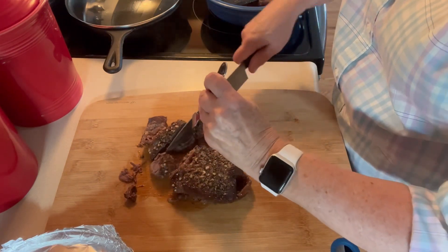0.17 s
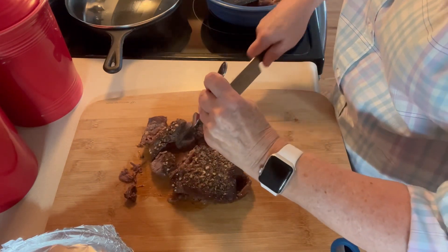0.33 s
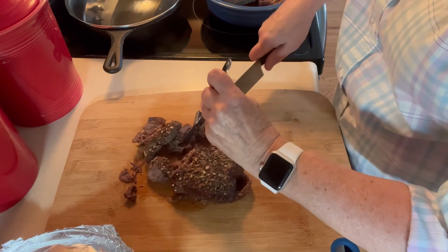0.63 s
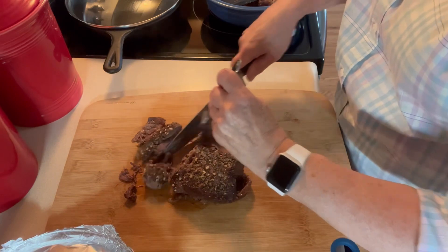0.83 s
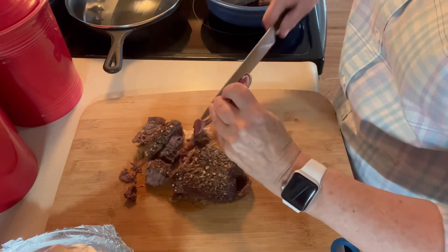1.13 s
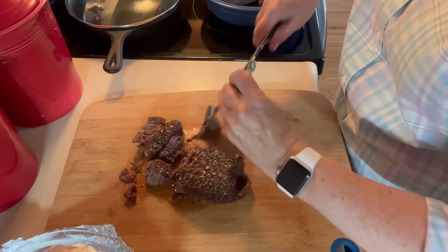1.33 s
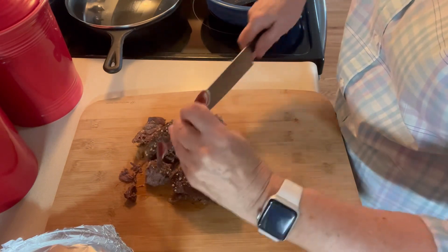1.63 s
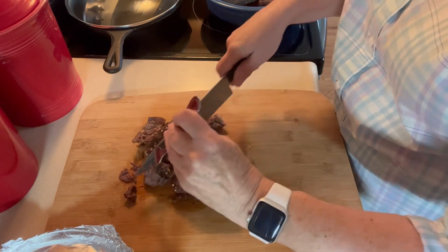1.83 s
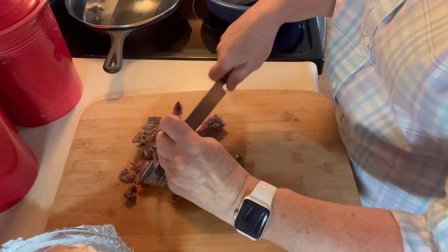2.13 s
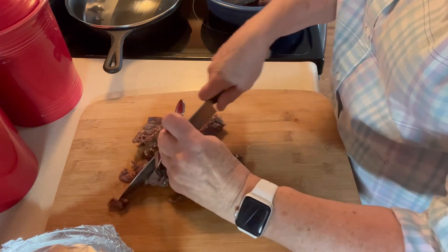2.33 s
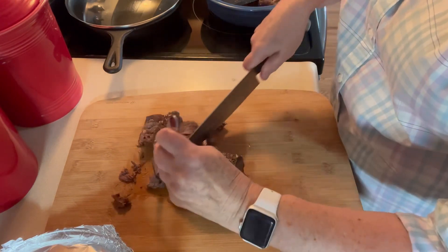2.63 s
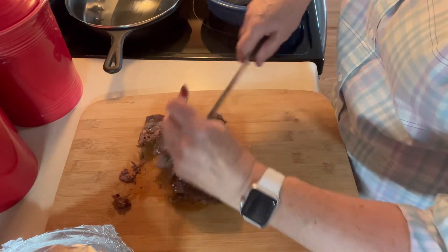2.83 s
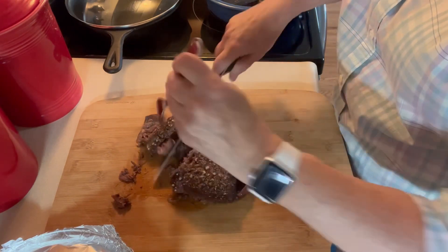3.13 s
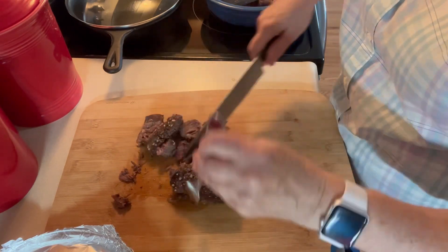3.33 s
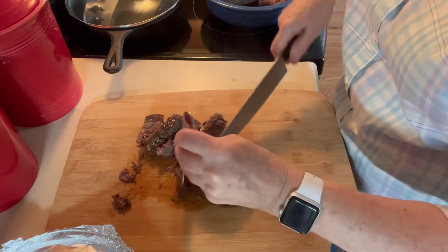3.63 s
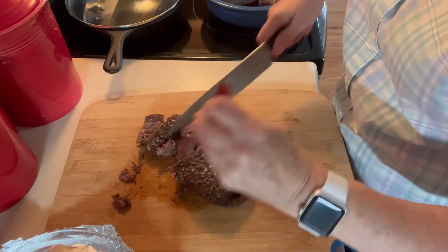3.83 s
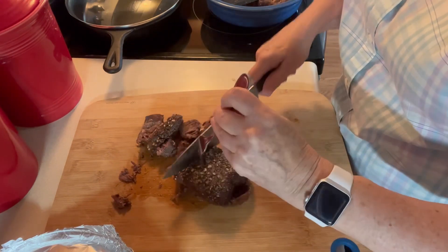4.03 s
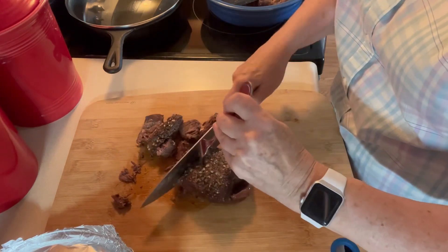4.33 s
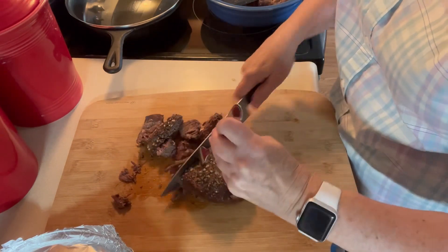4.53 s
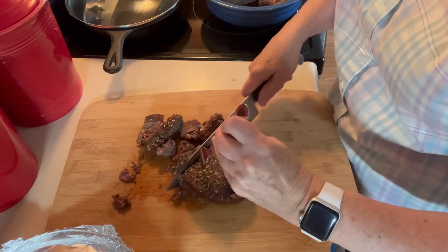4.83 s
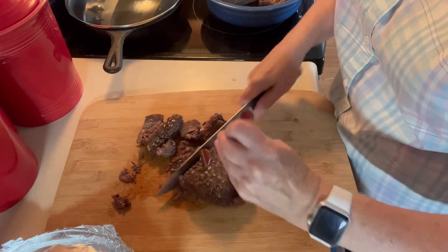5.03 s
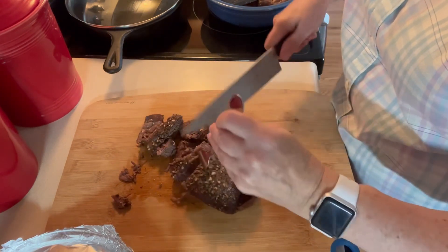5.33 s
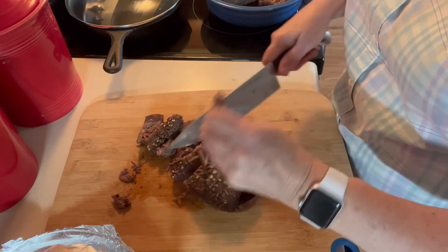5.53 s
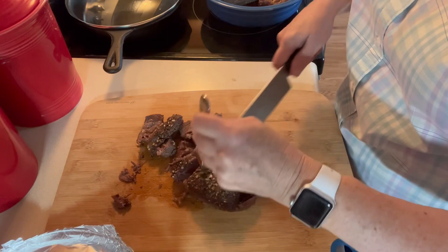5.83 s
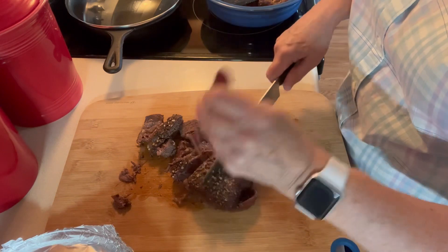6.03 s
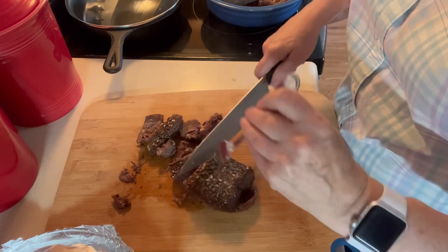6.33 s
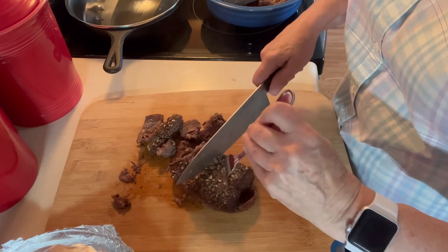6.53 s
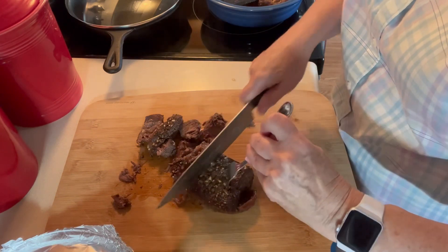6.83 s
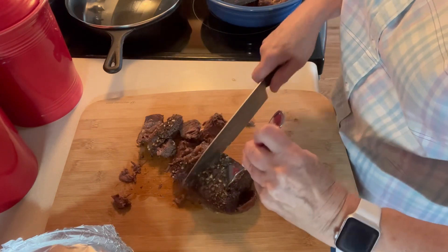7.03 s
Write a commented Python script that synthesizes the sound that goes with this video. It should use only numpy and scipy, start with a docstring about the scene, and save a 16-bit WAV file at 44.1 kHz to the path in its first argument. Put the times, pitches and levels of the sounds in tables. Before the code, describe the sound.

Close-up meat carving: dry scraping knife strokes, woody thuds, two brief metallic scrapes of blade on fork, moist ticks, over soft appliance hum.

```python
"""Friction and impact in carving a roast

A carving knife saws through a roast on a wooden board in a small kitchen, close to the two microphone ports.
Stick-slip noise shaped by resonances gives the rasp of the crust, the drone of the board and the blade's
scrapes and squeaks along the steel fork. Struck modes give the knocks and clinks; short noise bursts, the
moist ticks. Soft rustles are banded noise; behind all, an appliance hums in wavering sines over noise."""
import sys
import numpy as np
from scipy import signal
from scipy.fft import rfft, irfft, next_fast_len
from scipy.io import wavfile
from scipy.ndimage import uniform_filter1d, map_coordinates

SR = 44100
rng = np.random.default_rng(int(sys.argv[2]) if len(sys.argv) > 2 else 0)


def store_wav(level_fs):
    """Save 16-bit WAV to argv[1]."""
    pcm = np.round(np.clip(np.atleast_2d(level_fs), -1, 1) * 32767)
    wavfile.write(sys.argv[1], SR, pcm.T.astype(np.int16))


N = 316269  # samples
TOP_HZ = 16900  # upper band limit

# appliance motor: (f/Hz, level/dB, waver of the phase/rad)
MOTOR_HUM = [(57, -50, 0.84), (120.4, -43, 1.6), (196.1, -53.5, 0.35), (221.9, -52.5, 2.2),
             (257.5, -45, 0.46), (371, -61, 0.76)]
# spectrum of the room air: (f/Hz, level/dB)
AIR_COLOUR = [(20, -19), (35, -14.5), (55, -1), (85, 2.5), (115, -10), (150, -2.5), (250, -7), (400, -13),
              (650, -22.5), (1400, -28.5), (2400, -37), (4600, -50.5), (12000, -59.5), (16000, -61.5)]
# left-right likeness of the air noise: (f/Hz, likeness)
AIR_ALIKE = [(60, 1), (180, 0.29), (550, -0.015), (1650, -0.46), (4970, 0.39), (15000, -0.33)]

# decay of the room's tail: (f/Hz, t60/s)
KITCHEN_DECAY = [(150, 0.99), (700, 0.51), (3000, 0.48), (8000, 0.3), (15000, 0.28)]
# left-right likeness of the echoes: (f/Hz, likeness)
ECHO_ALIKE = [(200, 0.075), (800, 0.033), (4000, 0.057), (7000, 0.038), (9500, 0.72), (12000, 0.0028),
              (14000, 1)]
# the two microphone ports: (f/Hz, lead of left/rad)
PORT_PHASE = [(200, 0), (750, .45), (2000, -.3), (3000, -.7), (5000, -2.3), (7000, -1.8), (8000, -1.1),
              (9100, -.15), (10700, .15), (12000, 1.7), (13000, 2.6), (14300, 3.1), (15500, 3.7)]
# the two microphone ports: (f/Hz, left minus right/dB)
PORT_TILT = [(100, 3.5), (700, 3.5), (1200, -1), (2400, 0.5), (4500, -5), (8000, -1), (13000, 0)]
ECHO_TURN_HZ = 1.1  # two echo patterns trade places steadily, so that the echo colour keeps changing

# soft rustles as the arms and the meat are shifted: (t of the peak/s, length/s, level/dB, centre f/Hz)
RUSTLES = [(1.485, 0.18, -57.5, 1560), (6.432, 0.2, -72, 2100), (6.64, 0.12, -85, 2185)]
RUSTLE_WIDTH_HZ = 1100

# clearest moist ticks of meat and juice: (t/s, level/dB, f/Hz)
CLEAR_TICKS = [(0.359, -40, 5800), (0.7125, -27, 9100), (1.8935, -39, 8100), (2.1345, -31.5, 5300),
               (3.6226, -46, 3020), (3.642, -41.5, 8200), (3.7797, -47, 7900), (4.0256, -44.5, 5300),
               (4.095, -44.5, 9030), (4.1933, -49, 11700), (4.4934, -39, 7100), (5.3541, -40.5, 3290),
               (5.399, -40.5, 4010), (5.5677, -50.5, 3390), (5.985, -40, 8800), (6.028, -41, 8360),
               (6.149, -41, 6000), (6.383, -57, 3000), (6.4373, -46.5, 3090), (6.578, -48.5, 11100),
               (7.0892, -43, 8920)]
# spells of shifting the meat, with faint ticks at random: (start t/s, end t/s)
HANDLING = [(3.901, 4.3), (6.299, 6.8)]
# spectrum of a moist snap: (f/Hz, level/dB)
MOIST_COLOUR = [(500, -27), (2000, -8), (5000, 1.5), (9000, -4), (12500, -4), (16000, 3)]
FAINT_DB, FAINT_SPREAD_DB = -66, 3
FAINT_HZ, FAINT_SPREAD_OCT = 6840, 0.5

# modes of the blade: (f/Hz, width/Hz, level/dB)
BLADE_MODES = [(2900, 13, -11.5), (3840, 130, -2), (5110, 150, -4.5), (5100, 80, -5.5), (7200, 54, -8.5),
               (7060, 58, -7.5), (7940, 110, -7), (8330, 160, 0), (8800, 150, -7.5), (9500, 120, -4.5),
               (9730, 240, -8.5), (10860, 160, -1.5), (12400, 400, -5.5)]
# spectrum of the steel scrape: (f/Hz, level/dB)
SCRAPE_COLOUR = [(200, -20.5), (700, -10.5), (1800, -7), (2600, -10), (3800, -4), (5300, 2), (6800, -4),
                 (9000, 1), (11000, -3), (12700, 4.5), (14000, 7), (16000, -2.5)]
# blade slides along the fork, one table per slide: (t/s, level/dB)
SLIDES = [
    [(1.277, -40.5), (1.295, -41.5), (1.32, -37.5), (1.338, -39), (1.355, -39.5), (1.385, -37.5),
     (1.41, -54.5), (1.44, -69.5)],
    [(2.93, -36.5), (2.948, -32.5), (2.962, -30), (2.978, -30), (2.99, -33), (3.0, -30), (3.015, -45.5)],
]
# treble of each slide against its middle range: level/dB
SLIDE_TREBLE_DB = [-2, -6]
# the sliding blade catches and squeaks: (start t/s, length/s, level/dB, first f/Hz, last f/Hz)
SQUEAKS = [(1.27, 0.026, -40, 4240, 3800), (1.28, 0.022, -48, 5100, 5600), (1.28, 0.036, -37, 8000, 8480),
           (1.292, .02, -39.5, 9600, 9200), (1.312, 0.023, -41.5, 7200, 9800),
           (1.312, 0.031, -46.5, 3800, 3800), (1.319, 0.012, -40, 8000, 6900),
           (1.326, 0.052, -43.5, 5480, 6400), (1.337, 0.0325, -43.5, 4230, 3300),
           (1.335, 0.064, -60, 2750, 2600), (1.272, 0.035, -53, 3350, 3400),
           (1.335, 0.046, -54, 5050, 4750), (1.325, .06, -49, 6550, 7700),
           (1.345, 0.028, -44.5, 8700, 9850), (1.345, 0.062, -42.5, 12600, 13000),
           (1.364, 0.017, -50, 3900, 4100), (1.32, .075, -58, 3500, 2700), (2.924, 0.032, -37, 4830, 4500),
           (2.95, 0.023, -41.5, 3850, 2900), (2.971, 0.0091, -37, 2980, 3800),
           (2.969, 0.02, -32, 5500, 5900), (2.966, 0.018, -35, 8600, 9830), (2.966, .016, -36, 7400, 8300),
           (2.98, 0.02, -38, 5400, 4700), (2.989, 0.016, -34.5, 8850, 8700)]
# unsteadiness, its changes per second, share of the length spent rising (and again falling)
SQUEAK_FUZZ, SQUEAK_FUZZ_RATE, SQUEAK_EDGE = 0.36, 490, 0.38

# blade meets fork: (t/s, chatter level/dB, low chatter level/dB, chatter t60/s, strongest ring f/Hz,
# fork ring level/dB, fork pitch ratio, f below which the meat muffles the tines/Hz)
CLINKS = [(1.2723, -39.5, -21, 0.046, 8900, -48.5, 1, 2500),
          (1.816, -56, -3.5, 0.11, 9550, -34.5, 0.68, 5200),
          (2.9233, -37.5, 2.5, 0.03, 8735, -41, 0.97, 600), (5.834, -46.5, -8, 0.053, 7780, -36, 1, 605),
          (5.841, -52, -22, 0.032, 7700, -39, 0.84, 600)]
# modes of the tines before the pitch ratio: (f/Hz, level/dB, t60/s)
FORK_MODES = [(760, -11, 0.054), (1200, -12, .08), (1840, -15.5, 0.046), (2160, -11.5, 0.12),
              (2780, -16, 0.041), (3080, -14, .09), (3690, -2.5, 0.075), (4000, -5.5, 0.06),
              (4440, -3, 0.07), (4920, -5.5, 0.08), (5430, -5, 0.082), (5960, -9, 0.059), (6880, 1, 0.063),
              (7500, 1, 0.097), (8800, -7.5, .08), (10900, -3.5, 0.041), (11600, -8, .06)]
RATTLE_RAD, RATTLE_RATE = 0.7, 230  # the rattling blade roughens the ring: phase jitter, changes per second

# modes of the wooden board, free of the blade's pressure: (f/Hz, level/dB, t60/s)
BOARD_MODES = [(68, -21.5, 0.17), (142, -12, 0.13), (232, -12.5, 0.11), (300, -16, 0.1), (457, -7, 0.11),
               (478.4, -9, 0.12), (574, -11.5, 0.083), (684, -20, 0.011), (719, -12.5, 0.1),
               (815, -11, 0.14), (1044, -13, 0.08), (1386, -8, 0.021), (1470, -9.5, 0.03),
               (2069, -8.5, 0.02), (4000, -7.5, 0.0078), (4350, 0.5, 0.0088)]
# blows on the board: (t/s, level/dB, struck spot f/Hz, contact cut-off f/Hz, low modes level/dB, crack level/dB)
KNOCKS = [(0.424, -28.5, 702, 2000, 0.5, -1.5), (.538, -29, 455, 550, 1.5, -30),
          (.756, -41, 761, 2500, 6.5, 3.5), (0.8403, -14, 732, 850, -10, -16.5),
          (.868, -26, 597, 700, 2, -28), (1.232, -17, 760, 900, -3.5, -30),
          (2.057, -31.5, 770, 1220, 4.5, -12), (2.1748, -22.5, 789, 2000, 0.5, -19),
          (3.0209, -23.5, 880, 797, -4, -31.5), (3.0245, -4, 844, 2500, -8, 1),
          (3.033, -10, 480, 450, -4.5, -29.5), (3.075, -23, 740.5, 800, 8.5, -19),
          (4.565, -26, 760, 1250, 4, -20), (5.154, -30.5, 644, 1310, 0, -23),
          (5.355, -49, 809, 2490, -10, -19)]
# parts of the wide board swing out of step, so a blow reaches the ports unlike: (f/Hz, lead of left/rad)
BOARD_PHASE = [(100, -0.91), (450, 0.81), (800, 0.49), (1200, -1.4), (2000, -0.91), (3500, -1.5)]
# spectrum of the crack of a blow: (f/Hz, level/dB)
CRACK_COLOUR = [(200, -8), (1150, -2), (1520, 11.5), (1750, 4), (2020, 12.5), (2400, -0.5), (3200, -7),
                (4200, 5.5), (5200, -2.5), (6300, -6.5), (7500, -21), (14000, -30)]

# strokes of the knife: (start t/s, length/s, rise/s, board drone level/dB, crust rasp level/dB,
# edge hiss level/dB, pinched blade's ring f/Hz, that ring's level/dB, rubbed spot f/Hz)
STROKES = [ (0, 0.2, 0.11, -64, -62, -57, 2400, -15, 690),
           (0.16, 0.21, 0.03, -73, -68.5, -63.5, 2550, -13, 704),
           (0.306, 0.22, 0.073, -57, -59.5, -61, 2560, -13, 740),
           (0.418, 0.059, 0.0049, -32, -36, -46, 2370, 12, 713),
           (0.476, 0.17, 0.096, -42, -42, -49, 2520, 1, 790),
           (0.64, 0.12, 0.037, -70, -57, -59, 2430, 5, 780),
           (0.744, 0.27, 0.0056, -49, -52.5, -60, 1260, -11, 780),
           (0.797, 0.27, 0.14, -44.5, -42.5, -47, 2500, 0, 780),
           (1.912, 0.31, 0.092, -86, -65, -63, 1730, -22, 800),
           (2.114, 0.19, 0.1, -45.5, -44.5, -42.5, 1560, 2, 800),
           (2.291, 0.43, 0.074, -50.5, -45.5, -46, 2000, -1, 830),
           (2.32, 0.25, 0.063, -62.5, -52.5, -65, 1488, 10, 881),
           (2.737, 0.19, 0.043, -61.5, -64.5, -75, 1750, -1, 795),
           (4.119, 0.22, 0.12, -90, -89, -62, 2220, -3, 800),
           (4.274, 0.27, 0.11, -80, -63, -64.5, 2190, -22, 793),
           (4.485, 0.16, 0.048, -74, -58, -43, 4000, 6, 800),
           (4.54, 0.12, 0.099, -43, -44.5, -50, 2760, -8, 780),
           (4.629, 0.2, 0.097, -44.5, -44, -41, 2210, -13, 810),
           (4.813, 0.16, 0.066, -44, -41, -44.5, 2220, -1, 835),
           (4.946, 0.2, 0.081, -39.5, -42.5, -46, 2870, -7, 743),
           (5.053, 0.19, 0.096, -49.5, -44.5, -49, 1230, 1.5, 725),
           (6.58, 0.49, 0.087, -91.5, -94, -67.5, 2080, -3, 800),
           (6.713, 0.099, 0.021, -79, -82, -58.5, 2080, -1, 800),
           (6.892, 0.21, 0.03, -78, -73.5, -67.5, 2100, -7, 797),
           (7.051, 0.22, 0.066, -86, -72, -63, 2100, -7, 810), ]
# edge cuts through and judders on bare wood: (t of hardest pressure/s, length/s, level/dB, f/Hz)
DRAGS = [(0.528, 0.045, -37, 720), (0.565, 0.085, -37, 770), (0.826, 0.035, -31, 800),
         (0.871, 0.032, -43, 704), (4.777, 0.07, -43, 790), (4.873, 0.063, -41, 790),
         (5.149, 0.089, -37.5, 725)]
# spectrum of the crust rasp: (f/Hz, level/dB)
RASP_COLOUR = [(300, -23), (800, -14.5), (1100, -8), (1400, 5.5), (1750, -4.5), (2100, -2.5), (2600, -3),
               (3300, -5), (3900, -1.5), (4600, -4.5), (5300, -3), (7500, -14.5), (14000, -43.5)]
# spectrum of the edge hiss: (f/Hz, level/dB)
HISS_COLOUR = [(1500, -32.5), (4000, -8), (5500, 0.5), (7000, -4.5), (9000, -2), (11000, -6), (12700, 3),
               (14000, 0.5), (16000, -4.5)]
# spectrum of the rubbed board: (f/Hz, level/dB)
DRONE_COLOUR = [(150, -8), (350, -2.5), (450, 3), (590, 2), (800, 4), (1100, -5), (1400, -11), (1650, -12),
                (2500, -7.5)]
STOP_S = 0.095  # the blade slows before it turns round
# a stroke grows softer and duller as the edge sinks in
DRONE_SAG_DB_PER_S, RASP_SAG_DB_PER_S, HISS_SAG_DB_PER_S = 30, 33.5, 51
# single fibres and crumbs of crust: snaps per second, middle pitch, cycles to fall 60 dB, level against the rasp
FIBRE_RATE, FIBRE_HZ, FIBRE_CYCLES, FIBRE_DB = 330, 2730, 30, -6.5
FIBRE_SPREAD_OCT, FIBRE_SPREAD_DB = 0.65, 4
DRONE_DRIFT, DRONE_DRIFT_RATE = 0.03, 13  # scale of the random pitch drift (share of pitch), changes per second
BLADE_WIDTH_HZ, SPOT_WIDTH_HZ = 140, 115  # widths of the pinched blade's ring and of the rubbed spot's
SPOT_DB = 3  # rubbed spot over the rest of the board


def amp(db):
    """Decibel law: level to amplitude ratio."""
    return 10 ** (np.asarray(db) / 20)


def unit(x):
    """Normalisation: scale to rms 1."""
    return x / np.sqrt(np.mean(x ** 2) + 1e-20)


def along(points, hz):
    """Interpolation: (f/Hz, value) points read on a logarithmic frequency axis."""
    f, v = np.transpose(points)
    return np.interp(np.log(hz + 1), np.log(f + 1), v)


def curves(rows):
    """Interpolation: one value per sample for each column after the time."""
    s, *cols = np.transpose(rows)
    return np.array([np.interp(np.arange(N) / SR, s, c) for c in cols])


def during(rows):
    """Gating: 1 within a table's time span, with 5 ms fades outside it."""
    t = np.arange(N) / SR
    return np.clip(np.minimum(t - rows[0][0], rows[-1][0] - t) / .005 + 1, 0, 1)


def ease(u):
    """Raised-cosine law: a smooth step from 0 to 1 as u goes from 0 to 1."""
    return np.sin(np.pi / 2 * np.clip(u, 0, 1)) ** 2


def wobble(rate, size=N):
    """Random modulation: a smooth curve through rate random knots per second."""
    knots = rng.standard_normal(int(size * rate / SR) + 4)
    return map_coordinates(knots, [np.arange(size) * rate / SR])


def filtered(x, response):
    """Linear filtering: the spectrum of x times a complex response of frequency."""
    n = x.shape[-1]
    m = next_fast_len(n + 8192)
    return irfft(rfft(x, m) * response(np.fft.rfftfreq(m, 1 / SR)), m)[..., :n]


def coloured(x, spectrum):
    """Spectral shaping: x filtered by (f/Hz, level/dB) points."""
    return filtered(x, lambda hz: amp(along(spectrum, hz)))


def resonances(modes, hz):
    """Modal superposition: causal response of (f/Hz, width/Hz, level/dB) modes in alternating sign."""
    return sum((-1) ** k * amp(db) * 1j * hz * w / (c * c - hz * hz + 1j * hz * w)
               for k, (c, w, db) in enumerate(modes))


def add(track, s, sound):
    """Superposition: mix a sound into the track at time s."""
    part = track[max(round(s * SR), 0):][:len(sound)]
    part += sound[:len(part)]


def slips(rate, spread_db):
    """Friction: tiny random slips of uneven size, on average rate per second."""
    hit = rng.random(N) < rate / SR
    return unit(hit * rng.standard_normal(N) * amp(spread_db * rng.standard_normal(N)))


def shifting(x, patchy_db):
    """Moving contact: the colour of a scrape wanders as the point of contact moves."""
    z = signal.stft(x, nperseg=512)[2]
    field = rng.standard_normal(z.shape)
    field = uniform_filter1d(field, size=4, axis=0)  # smooth over frequency
    field = uniform_filter1d(field, size=12, axis=1)  # and over time
    return unit(signal.istft(z * amp(patchy_db * unit(field)), nperseg=512)[1][:N])


def paired(noises, alike):
    """Coherence: two unrelated noises become left and right with a (f/Hz, likeness) table."""
    turn = lambda hz: np.arccos(np.clip(along(alike, hz), -1, 1)) / 2
    mid, side = filtered(noises, lambda hz: np.array([np.cos(turn(hz)), np.sin(turn(hz))]))
    return np.array([mid + side, mid - side])


def leading(pair, phase):
    """Phase difference: left leads right by a (f/Hz, lead/rad) table."""
    sides = np.array([[.5], [-.5]])
    return filtered(pair, lambda hz: np.exp(1j * sides * along(phase, hz)))


def background(waver_rate=9, flutter_db=2.5, swell_db=0.3):
    """Line spectrum over noise: a motor hums unsteadily over the gently swelling rush of its fan."""
    t = np.arange(N) / SR
    hum = 0
    for hz, db, waver in MOTOR_HUM:
        phase = 2 * np.pi * (hz * t + rng.random()) + waver * wobble(waver_rate)
        hum = hum + amp(db + flutter_db * wobble(5.8)) * np.sin(phase)
    rush = unit(coloured(paired(rng.standard_normal((2, N)), AIR_ALIKE), AIR_COLOUR))
    return amp(-44 + swell_db * wobble(3.6)) * rush + hum


def echoes(early_db, early_t60, late_db):
    """Reverberation: one random pattern of quick echoes from counter and pots and the room's tail."""
    hz, t, z = signal.stft(rng.standard_normal((2, SR // 2)), SR, nperseg=256)
    decay = amp(-60 * t / along(KITCHEN_DECAY, hz)[:, None])
    late = signal.istft(z * decay, SR, nperseg=256)[1]
    t = np.arange(late.shape[1]) / SR
    early = rng.standard_normal(late.shape) * amp(-60 * t / early_t60) * (t > .002)
    late = late * (1 - np.exp(-t / 0.0062))
    return paired(amp(early_db) * unit(early) + amp(late_db) * unit(late), ECHO_ALIKE) / np.sqrt(len(t))


def kitchen(x, early_db, late_db, early_t60=0.037):
    """Convolution: each port hears the source and two echo patterns that trade places steadily."""
    turn = 2 * np.pi * ECHO_TURN_HZ * np.arange(N) / SR
    heard = x
    for share in (np.cos(turn), np.sin(turn)):
        pattern = echoes(early_db, early_t60, late_db)
        heard = heard + signal.fftconvolve((share * x)[None], pattern, axes=1)[:, :N]
    sides = np.array([[.5], [-.5]])
    return filtered(heard, lambda hz: amp(sides * along(PORT_TILT, hz))
                    * np.exp(1j * sides * along(PORT_PHASE, hz)))


def rustles():
    """Band-limited noise: a dull, soft rub swells and fades with each movement."""
    track = np.zeros(N)
    for s, length, db, centre_hz in RUSTLES:
        u = np.arange(int(length * SR)) / (length * SR)
        band = lambda hz: resonances([(centre_hz, RUSTLE_WIDTH_HZ, 0)], hz) ** 2
        rub = filtered(rng.standard_normal(len(u)), band)
        add(track, s - length / 2, amp(db) * unit(rub) * np.sin(np.pi * u) ** 2)
    return track


def faint_ticks(count=4):
    """Random occurrence: count (t/s, level/dB, f/Hz) rows for each spell of handling."""
    rows = []
    for start, end in HANDLING:
        for _ in range(count):
            s = rng.uniform(start, end)
            db = FAINT_DB + FAINT_SPREAD_DB * rng.standard_normal()
            rows.append((s, db, FAINT_HZ * 2 ** (FAINT_SPREAD_OCT * rng.standard_normal())))
    return rows


def ticks(t60=0.0098, ring_db=13, width_hz=1200):
    """Film rupture: small films of juice snap as the meat parts, each at its own pitch."""
    track, t = np.zeros(N), np.arange(SR // 16) / SR
    for s, db, pitch in list(CLEAR_TICKS) + faint_ticks():
        snap = coloured(rng.standard_normal(len(t)) * amp(-60 * t / t60), MOIST_COLOUR)
        snap = filtered(snap, lambda hz: 2.5 + resonances([(pitch, width_hz, ring_db)], hz))
        add(track, s, amp(db) * snap / np.abs(snap).max())
    return track


def steel(drive, ring_db=9):
    """Forced modes: the blade rings, its modes at new strengths for each point of contact."""
    modes = [(hz, width, db + 2 * rng.standard_normal()) for hz, width, db in BLADE_MODES]
    ring = filtered(drive, lambda hz: resonances(modes, hz))
    return coloured(drive, SCRAPE_COLOUR) + amp(ring_db) * ring


def slides(low_db=-5):
    """Sliding friction: the blade wiped along the tines scrapes brightly, unevenly, with little body."""
    track = np.zeros(N)
    for rows, treble_db in zip(SLIDES, SLIDE_TREBLE_DB):
        db, = curves(rows)
        rub = steel(slips(3700, 3) * amp(2 * wobble(200)), ring_db=2.5)
        rub = coloured(rub, [(2400, low_db), (3400, 0.0023), (6000, 0.0056), (12500, treble_db)])
        track += during(rows) * amp(db) * shifting(rub, 2.8)
    return track


def squeaks():
    """Stick-slip locking: friction locks onto a blade ring, which glides as the contact moves."""
    track = np.zeros(N)
    for s, length, db, first_hz, last_hz in SQUEAKS:
        u = np.arange(int(length * SR)) / (length * SR)
        phase = 2 * np.pi * np.cumsum(first_hz + (last_hz - first_hz) * u) / SR
        fuzz = SQUEAK_FUZZ * (wobble(SQUEAK_FUZZ_RATE, len(u)) + 1j * wobble(SQUEAK_FUZZ_RATE, len(u)))
        tone = unit(np.real((1 + fuzz) * np.exp(1j * phase)))
        add(track, s, amp(db) * tone * ease(u / SQUEAK_EDGE) * ease((1 - u) / SQUEAK_EDGE))
    return track


def clinks(rise=0.0012, main_db=10, main_width_hz=180, fork_rise=0.0019):
    """Impact and free decay: the blade chatters on the fork, favouring one mode; the tines ring on."""
    track, t = np.zeros(N), np.arange(SR // 3) / SR
    for s, db, low_db, t60, main_hz, fork_db, ratio, muffle_hz in CLINKS:
        chatter = slips(9000, 2)[:len(t)] * amp(-60 * t / t60) * (1 - np.exp(-t / rise))
        main = filtered(chatter, lambda hz: resonances([(main_hz, main_width_hz, main_db)], hz))
        ring = coloured(steel(chatter) + main, [(2600, low_db + 2.5), (4500, -0.88), (8000, 0.79)])
        tines = 0
        for hz, level, decay in FORK_MODES:
            size = amp(level + rng.normal(0, 1) - 60 * t / decay)
            phase = 2 * np.pi * (hz * ratio * t + rng.random()) + RATTLE_RAD * wobble(RATTLE_RATE, len(t))
            tines = tines + size * np.sin(phase)
        # the meat damps the low modes: a high-pass
        muffle = lambda hz: (1j * hz / (muffle_hz + 1j * hz)) * hz ** 2 / np.hypot(hz ** 2, muffle_hz ** 2)
        tines = filtered(tines * (1 - np.exp(-t / fork_rise)), muffle)
        add(track, s, amp(db) * unit(ring) + amp(fork_db) * tines)
    return track


def knocks(spot_db=2, spot_t60=0.048, crack_t60=0.005, click_s=0.0007, click_db=10,
           low_rise=0.0027, low_hz=600, thud_db=-20, thud_t60=0.22):
    """Impact: a soft contact excites mainly the board's low modes, and these build up more slowly."""
    track, t = np.zeros(N), np.arange(SR // 2) / SR
    for s, db, spot_hz, cut_hz, low_db, crack_db in KNOCKS:
        contact = lambda hz: 1 / np.hypot(1, (hz / cut_hz) ** 2)
        ring = amp(spot_db - 60 * t / spot_t60) * np.sin(2 * np.pi * spot_hz * t) * (1 - np.exp(-t / 0.0034))
        for hz, level, t60 in BOARD_MODES:
            low = hz < low_hz
            size = amp(level + low * low_db + rng.normal(0, 1)) * contact(hz)
            onset = 1 - np.exp(-t / (low_rise if low else .0007))
            ring += size * amp(-60 * t / t60) * np.sin(2 * np.pi * hz * t) * onset
        # the many weak modes of board and counter merge into a thud
        thud = unit(filtered(rng.standard_normal(len(t)), contact)) * amp(thud_db - 60 * t / thud_t60)
        # the edge bites with one sharp click and a brief splutter
        bite = rng.standard_normal(len(t)) * amp(-60 * t / crack_t60)
        add(bite, click_s, [amp(click_db)])
        crack = coloured(bite, CRACK_COLOUR)
        add(track, s, amp(db) * (ring / np.abs(ring).max() + thud + amp(crack_db) * crack))
    return track


def fibres():
    """Fracture: single fibres and crumbs of crust snap, each at its own pitch and size."""
    count = 4000
    track, t = np.zeros(N), np.arange(SR // 40) / SR
    gap, pitch, size = rng.exponential(1, count), rng.standard_normal(count), rng.standard_normal(count)
    for s, octaves, spread in zip(np.cumsum(gap) / FIBRE_RATE, pitch, size):
        cycles = min(FIBRE_HZ * 2 ** (FIBRE_SPREAD_OCT * octaves), TOP_HZ) * t
        level = FIBRE_SPREAD_DB * spread - 60 * cycles / FIBRE_CYCLES
        add(track, s, amp(level) * np.sin(2 * np.pi * cycles))
    return unit(track)


def drifting(x):
    """Slow random pitch drift: the drone's resonances waver by a few percent."""
    read = np.cumsum(1 + DRONE_DRIFT * wobble(DRONE_DRIFT_RATE))
    return np.interp(read, np.arange(N), x, period=N)


def judder(spot_hz, size, skirt_hz=700):
    """Local resonance: friction rings the spot of wood under the edge, at rms 1."""
    ring = lambda hz: (resonances([(spot_hz, SPOT_WIDTH_HZ, 0)], hz)
                       * resonances([(spot_hz, skirt_hz, 0)], hz))
    return unit(filtered(rng.standard_normal(SR), ring)[:size])


def board_body(damping_hz=70, patchy_db=2.2):
    """Damped modes: width and height under steady rubbing follow from t60; the pressing blade widens them."""
    wood = [(hz, np.log(1000) / np.pi / t60 + damping_hz, db + 20 * np.log10(t60))
            for hz, db, t60 in BOARD_MODES]
    rubbed = filtered(slips(3500, 2.3), lambda hz: resonances(wood, hz))
    return drifting(shifting(coloured(rubbed, DRONE_COLOUR), patchy_db))


def sawing(sweep_depth=0.083, near_ms=0.75, travel_ms=0.58, catch_db=0.5, catch_rate=170, patchy_db=3.6):
    """Stick-slip excitation: the edge tears crust and its drag drones the board; strokes rise, sag and stop."""
    body = board_body()
    crust = shifting(coloured(slips(4500, 1.3), RASP_COLOUR), patchy_db) + amp(FIBRE_DB) * fibres()
    edge = shifting(coloured(slips(9000, 1.9), HISS_COLOUR), patchy_db)
    t = np.arange(N) / SR
    drag, tearing, travel = np.zeros((3, N))
    for s, length, rise, drone_db, rasp_db, hiss_db, ring_hz, ring_db, spot_hz in STROKES:
        now = (t >= s) & (t < s + length)
        age = t[now] - s
        speed = ease(age / rise) * ease((length - age) / STOP_S)
        pinched = lambda hz: 0.5 + resonances([(ring_hz, BLADE_WIDTH_HZ, ring_db)], hz)
        rasp = amp(rasp_db - RASP_SAG_DB_PER_S * age) * unit(filtered(crust[now], pinched))
        hiss = amp(hiss_db - HISS_SAG_DB_PER_S * age) * edge[now]
        tearing[now] += speed * (rasp + hiss)
        drone = unit(body[now] + amp(SPOT_DB) * judder(spot_hz, len(age)))
        drag[now] += speed * amp(drone_db - DRONE_SAG_DB_PER_S * age) * drone
        travel[now] = age / length
    for s, length, db, spot_hz in DRAGS:
        press = np.hanning(int(length * SR))
        add(drag, s - length / 2, amp(db) * press * judder(spot_hz, len(press)))
    # the board mirrors the sound; the echo lengthens as the blade travels through each stroke
    mirrored = np.interp(t - (near_ms + travel_ms * travel) / 10 ** 3, t, tearing)
    return amp(catch_db * wobble(catch_rate)) * (tearing + sweep_depth * mirrored + drag)


def scene():
    """Superposition: carving on the counter, over the kitchen's hum."""
    hum = background()
    juice = kitchen(ticks() + rustles(), early_db=-1.5, late_db=-5)
    cutlery = kitchen(clinks() + slides() + squeaks(), early_db=-3.0, late_db=-10.5)
    blows = leading(kitchen(knocks(), early_db=-6, late_db=-13.5), BOARD_PHASE)
    cutting = kitchen(sawing(), early_db=0.5, late_db=-10.5)
    return cutting + blows + cutlery + juice + hum


def record(dry):
    """Band limitation: the response falls to nothing over the last 900 Hz below TOP_HZ."""
    return filtered(dry, lambda hz: np.clip((TOP_HZ - hz) / 900, 0, 1) ** 2)


dry = scene()
out = record(dry)
store_wav(out)
```